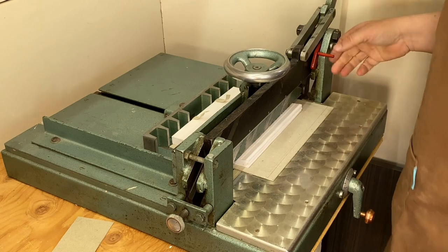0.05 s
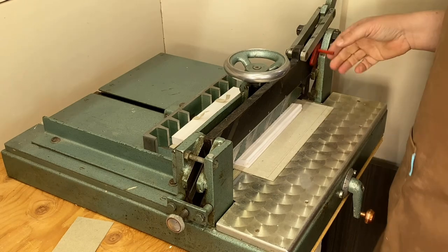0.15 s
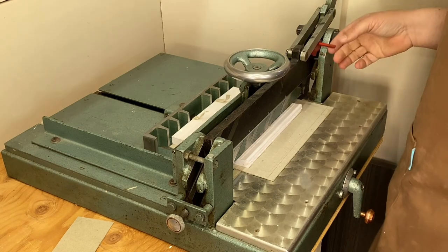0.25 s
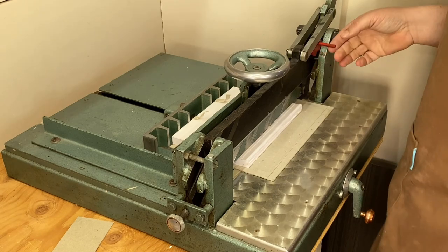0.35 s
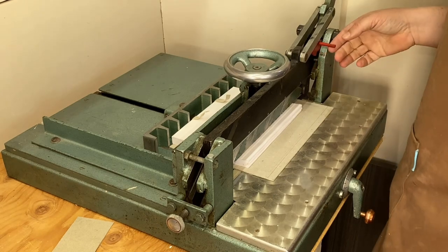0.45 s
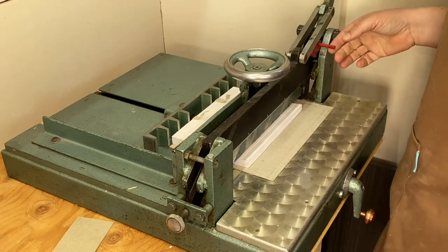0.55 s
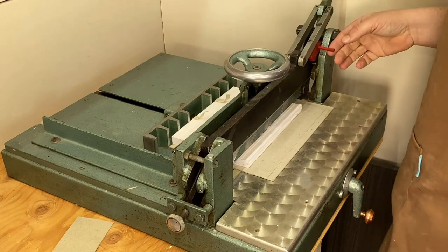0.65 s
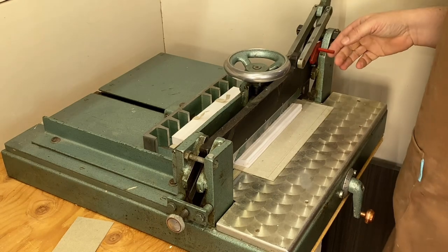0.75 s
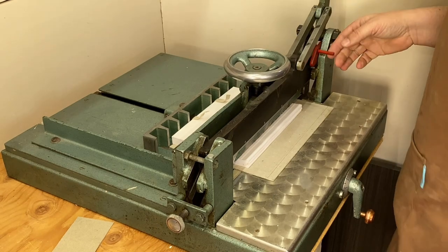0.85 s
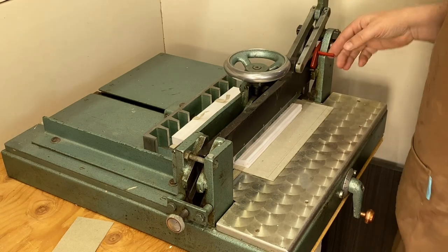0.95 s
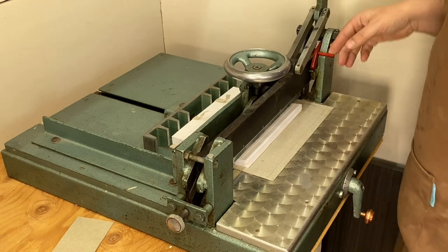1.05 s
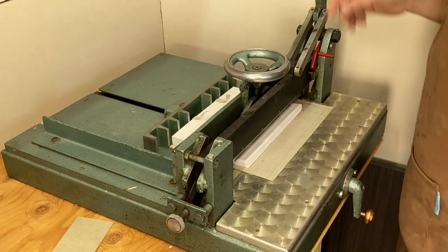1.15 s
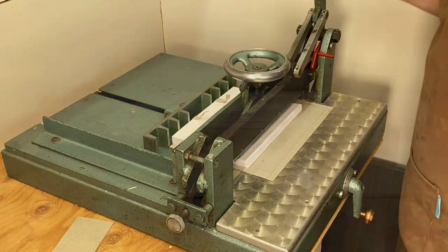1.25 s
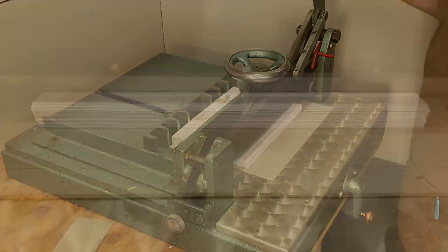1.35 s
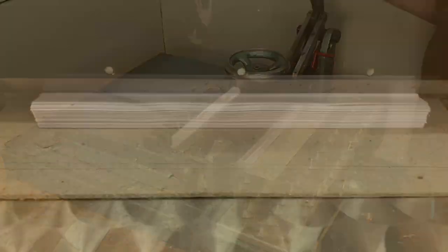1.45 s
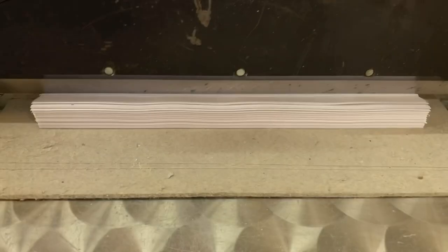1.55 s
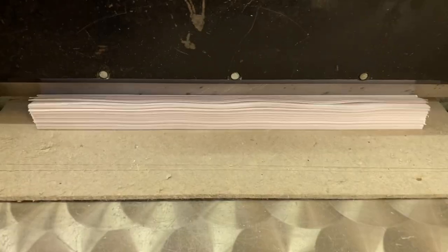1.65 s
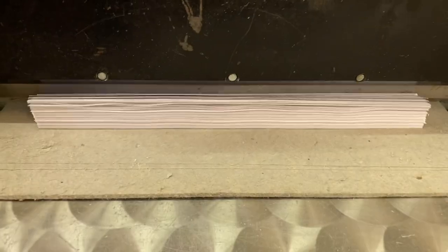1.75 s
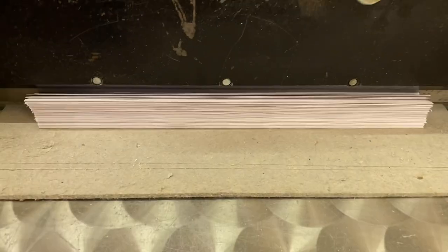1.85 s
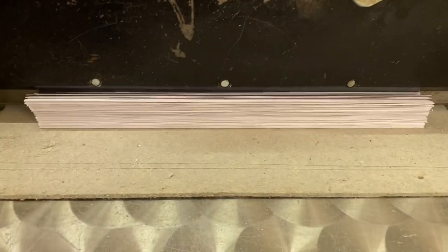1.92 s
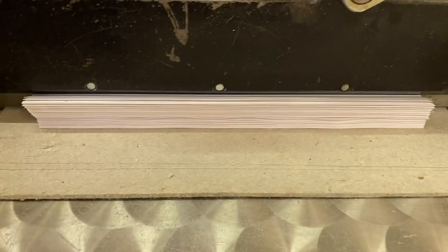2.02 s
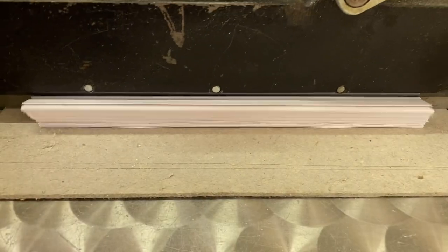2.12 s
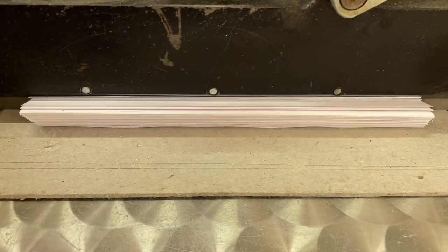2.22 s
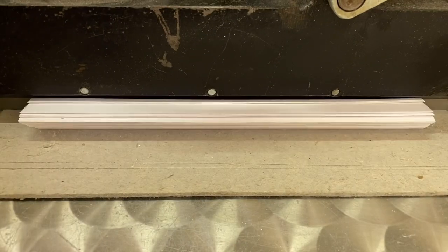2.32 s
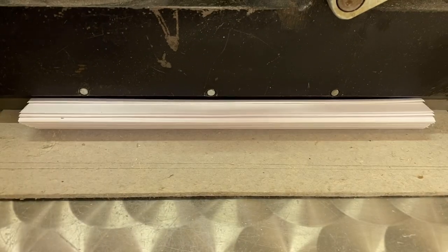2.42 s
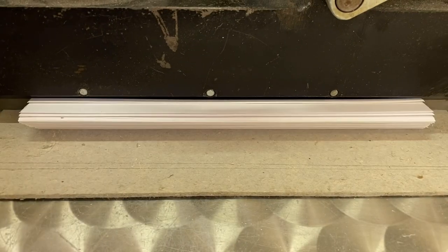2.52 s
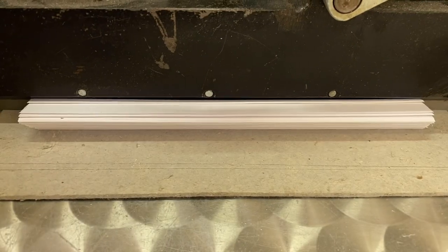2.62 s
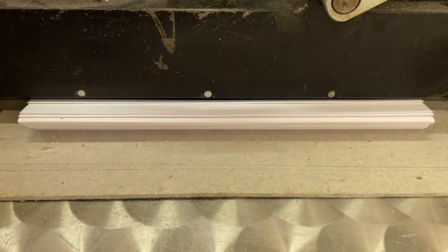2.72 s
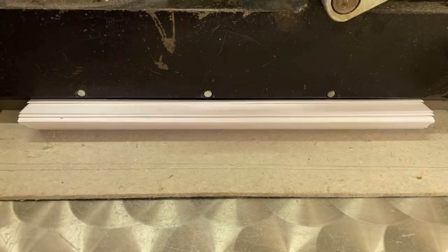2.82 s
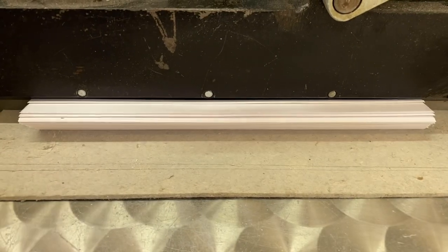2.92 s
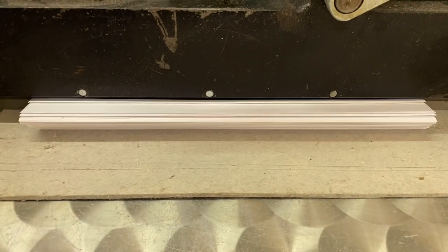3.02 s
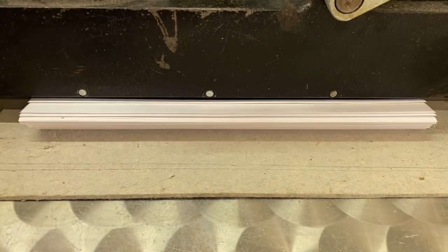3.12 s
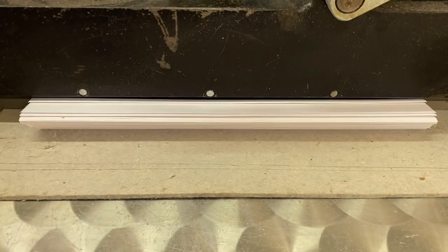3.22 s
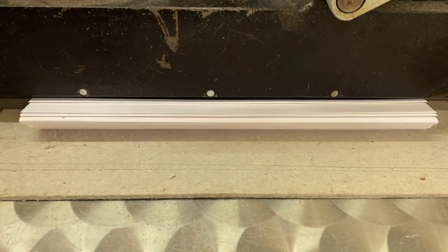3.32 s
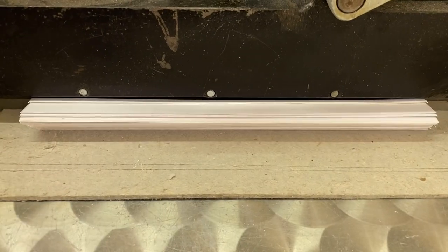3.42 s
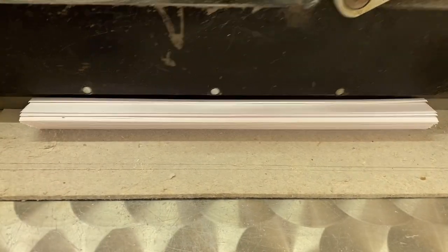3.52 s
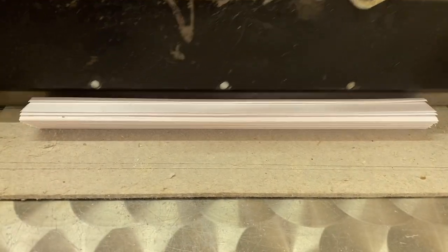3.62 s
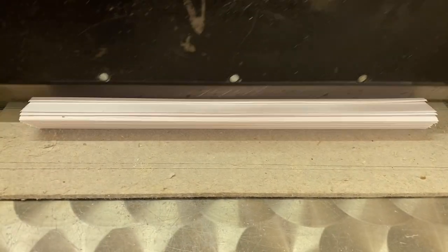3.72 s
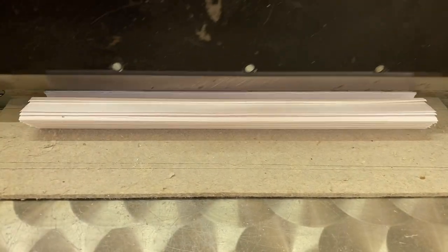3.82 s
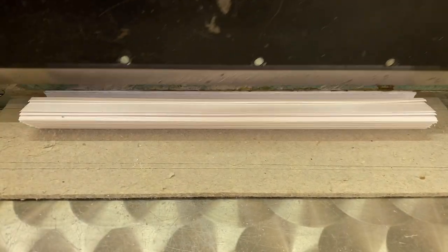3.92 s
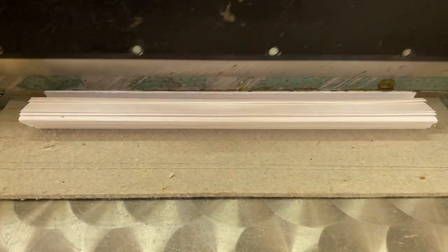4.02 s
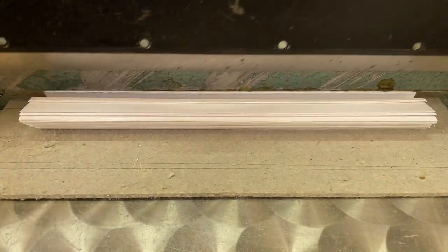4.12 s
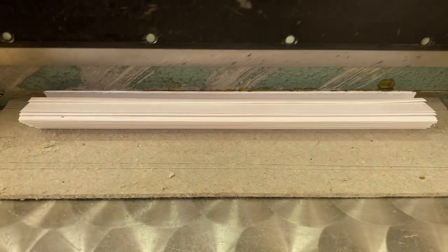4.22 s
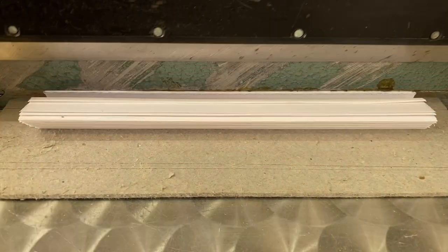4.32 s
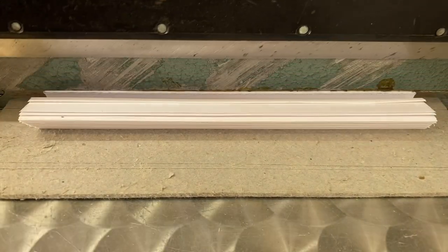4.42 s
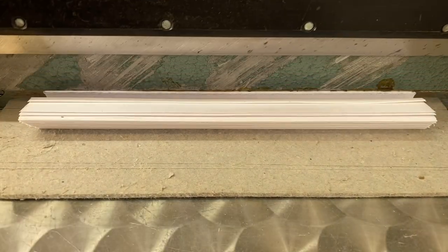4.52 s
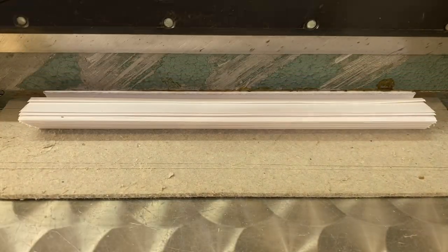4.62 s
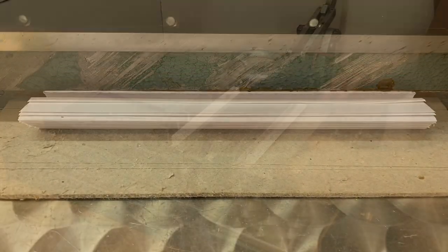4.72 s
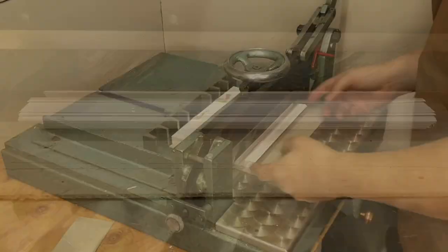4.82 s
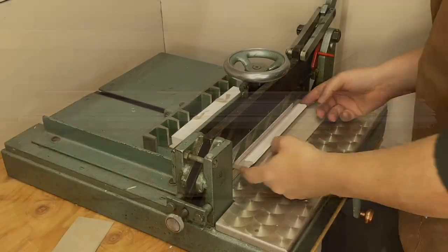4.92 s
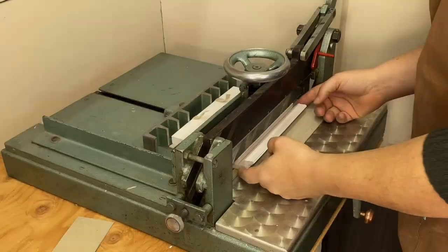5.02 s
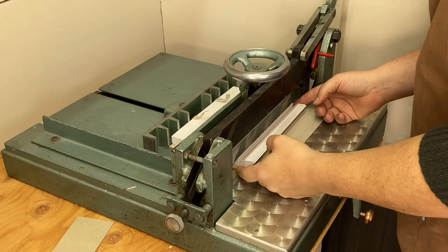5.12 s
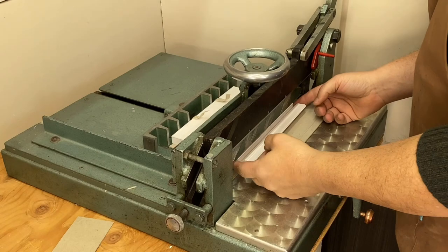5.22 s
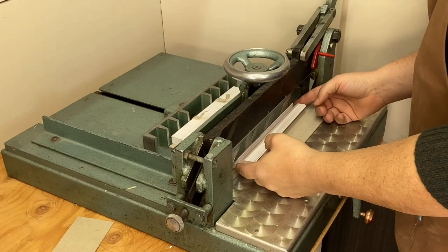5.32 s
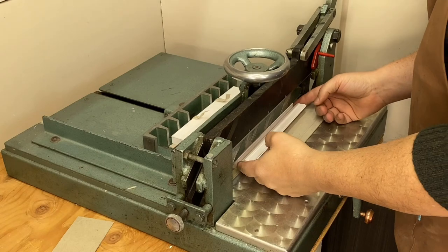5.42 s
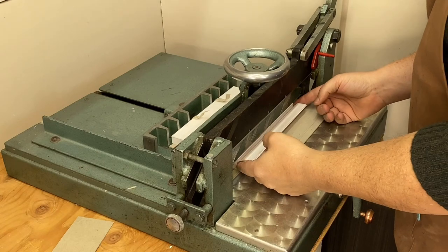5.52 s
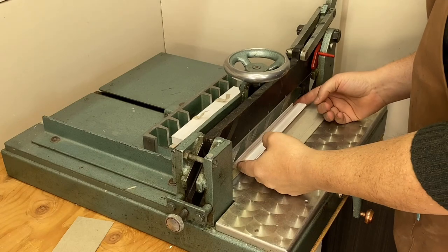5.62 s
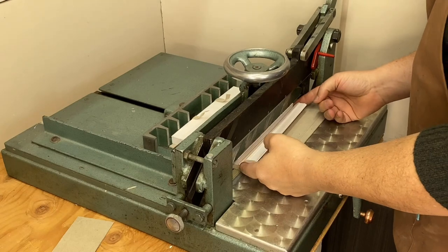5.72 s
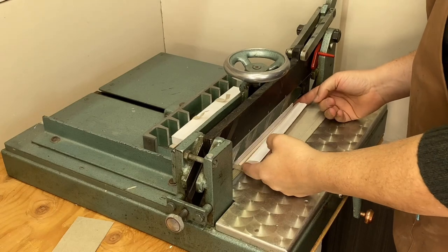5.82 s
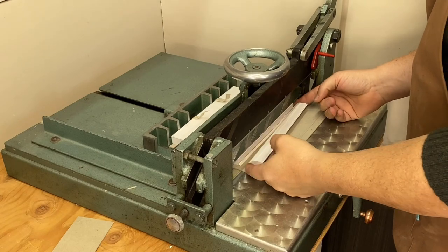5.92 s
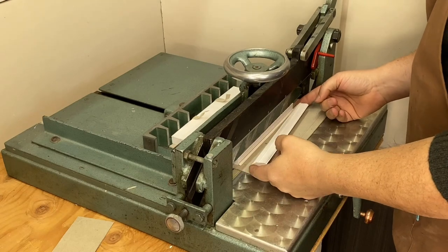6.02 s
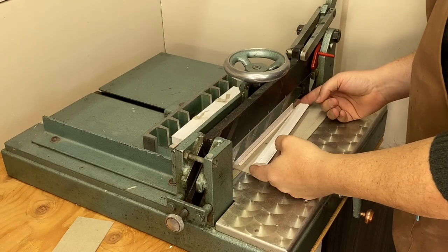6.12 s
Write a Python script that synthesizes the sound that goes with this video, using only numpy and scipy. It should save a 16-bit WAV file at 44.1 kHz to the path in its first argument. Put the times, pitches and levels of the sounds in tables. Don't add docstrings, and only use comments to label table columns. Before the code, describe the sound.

Metal lever knocks, then a cast-iron paper cutter grinds and groans through a stack, bangs on its bed, and the lever clacks up and latches.

```python
import sys
import numpy as np
from scipy import signal
from scipy.io import wavfile
from scipy.ndimage import uniform_filter1d

SR = 44100
rng = np.random.default_rng(int(sys.argv[2]) if len(sys.argv) > 2 else 0)


def inscribe(sig):
    pcm = np.round(np.clip(np.atleast_2d(sig).T, -1, 1) * 32767)
    wavfile.write(sys.argv[1], SR, pcm.astype(np.int16))


def attenuation_scalar(level_db):
    decades = np.asarray(level_db, float) / 20
    return 10 ** decades


N = 271656

# freq_hz, level_db
ROOM_TONE = [(35, -32), (60, 3.5), (161, -12.5), (384, -16), (629, -25), (759, -26), (874, -25),
             (5600, -39), (14000, -38.5), (15400, -44), (16500, -65)]
# freq_hz, width_hz, level_db
ROOM_WHINES = [(759, 54, 2.5), (11050, 80, -9)]
SWAY_HZ = (17.8, 28.4)
# time_s, level_db
LOAD = [(0.0, -45.5), (0.14, -34.5), (.6, -39), (1.05, -43), (1.27, -32), (1.45, -50), (1.52, -25),
        (2.3, -20), (2.4, -24), (2.55, -25), (2.7, -22), (3.95, -21.5), (4.2, -29), (4.5, -35), (5.0, -42),
        (5.7, -48.5), (6.16, -43.5)]
# time_s, slow_mode_db, fast_mode_db
HEAVES = [(1.3, -26, -33.5), (1.53, -20.5, -23.5), (1.78, -13.5, -22), (1.99, -13, -11.5),
          (2.13, -43, -17.5), (2.3, -21, -36), (2.75, -10.5, -18), (2.83, -31, -27), (3.02, -39, -45),
          (3.24, -21, -19), (3.5, -13, -49), (3.678, -9, -14.5), (3.829, -18, -23.5), (4.05, -47, -21.5)]
# start_s, level_db
JOLTS = [
    (1.35, -20.5),
    (1.92, -28),
    (2.592, -5.5),
    (3.55, -24.5),
    (3.92, -36),
    (4.88, -38),
]
# time_s, gain_db
LULLS = [(1.13, 0), (2.225, 0), (2.39, -16), (2.54, -4), (2.72, -3), (3.07, -7.5), (3.45, -3), (4.2, -6),
         (4.33, -3), (4.47, -5)]
# time_s, level_db
MOTION = [(0.0, -67), (1.29, -72), (1.41, -66), (1.53, -58.5), (1.71, -43.5), (2.04, -46.5), (2.13, -50),
          (2.32, -60.5), (2.54, -60), (2.69, -48), (2.85, -61.5), (3.21, -64), (3.38, -54.5), (3.62, -51.5),
          (3.75, -57), (4.15, -59), (4.3, -67.5), (6.16, -75)]
# start_s, length_s, frame_db, bench_top_db
PRESSES = [
    (0.0, 0.26, 1, 6.5),
    (0.483, 0.19, 11.5, 9),
    (1.41, 0.079, -0.5, 2),
    (1.413, 0.66, 16, 2.5),
    (2.063, 0.56, 0.5, -1.5),
    (2.445, 0.2, 9.5, -6),
    (3.38, 0.044, -22.5, 0),
    (3.546, 0.15, -18, 3.5),
    (4.126, 0.56, 0.5, 5),
    (4.958, 1.5, 1, -9.5),
]
# freq_hz, width_hz, level_db
FRAME = [(108, 11.2, 5.5), (138.3, 6.3, 3), (182.4, 25, -1.5), (255, 7.8, -5.5), (300, 24, -3),
         (360.6, 18, -3.5), (420, 18, -6), (480, 9.6, -10.5), (534, 18.6, -13), (837, 90, -13),
         (998, 35, -18), (1545, 100, -24)]
# freq_hz, level_db_per_hz
SHEAR = [(290, -24.5), (500, -20.5), (820, -10), (1500, -10.5), (2700, -14), (5000, -16), (8800, -22),
         (12000, -34.5), (15500, -21.5)]
# start_s, peak_db, thud_re_peak_db, brightness_re_peak_db, t60_s
KNOCKS = [(0.031, -34, -10.5, -12, 0.3), (0.175, -33, -14, -30, 0.19), (0.204, -23.5, -14, -27, 0.2),
          (0.262, -51, 7, -25, 0.44), (0.304, -37, -15, -35, 0.13), (0.313, -34.5, 18.5, -35, 0.22),
          (0.436, -56, -9, -29, 0.1), (0.648, -21.5, -4, -12.5, 0.21), (0.915, -55, 4.5, -3, 0.26),
          (1.151, -45, 15.5, -30, 0.22), (1.35, -19, -0.5, -17, 0.25), (1.472, -34, -2, -12, 0.22),
          (1.497, -35.5, 0, -3.5, 0.78), (1.644, -35, 20, -33, 0.18), (2.115, -36, 2, -7, 0.11),
          (2.324, -39.5, -1.5, -5, 0.17), (2.428, -43.5, -11, -4.5, 0.057), (2.99, -53, 15, -18, 0.24),
          (3.147, -38, 4, -18, 0.31), (3.368, -39.5, -3, -23, 0.3), (4.088, -39, -5, -5.5, 0.22)]
# start_s, peak_db, thud_re_peak_db, brightness_re_peak_db, t60_s
TOUCHES = [(0.64, -35, -25, -32, 0.072), (.9925, -20, -31, -2, 0.053), (1.001, -27, -2, 2.5, 0.043),
           (1.009, -24, -10.5, -16, 0.29), (1.019, -35.5, -34, 2, 0.22), (1.336, -45, 16.5, -16, 0.51),
           (2.815, -41, 2, -3.5, 0.033), (3.068, -42, 11, -8, 0.13), (3.081, -29, 1, -17, 0.2),
           (3.482, -28.5, 5.5, -21, 0.29), (3.499, -16, -12, -2.5, 0.18), (3.722, -37.5, 7.5, -9, 0.073),
           (3.735, -47, 17.5, -16, 0.23), (3.984, -27.5, -9.5, -22, 0.19), (4.674, -56, 17, -49, 0.23),
           (4.880, -63, -4, -29, .05), (5.388, -66, -5.5, -1, 0.055), (5.897, -51, -17, -9, 0.047)]
# freq_hz, level_db
KNOCK_COLOUR = [(70, -2.5), (130, 5.5), (300, 6.5), (700, -6), (1500, -7.5), (3500, -12), (7000, -5.5),
                (11000, -12), (16000, -20)]
# freq_hz, share_of_t60
DECAY_SHARE = [(80, 1.49), (300, 0.58), (1500, 0.66), (6000, 0.85), (15000, 0.83)]
# start_s, freq_hz,
# width_hz, level_db, t60_s
SHEENS = [(.033, 5500, 4000, -50, 0.17), (.263, 5500, 4000, -62, .05), (.316, 4330, 1500, -50.5, 0.17),
          (.652, 5970, 2500, -54, 0.17), (1.004, 2820, 1300, -30.5, 0.17), (1.003, 8400, 3000, -41, 0.25),
          (1.225, 5800, 4000, -57, 0.017), (1.352, 5400, 2560, -37, 0.18), (1.648, 1040, 500, -32, 0.094),
          (1.6993, 2500, 3000, -47, .02), (1.7895, 3000, 4000, -37, .018), (1.818, 4200, 3000, -38, 0.024),
          (1.851, 1900, 900, -40, 0.036), (1.932, 2200, 3010, -40, 0.016), (2.408, 6100, 8000, -59, .03),
          (2.474, 5000, 8000, -63, .03), (2.591, 3920, 250, -31, 0.25), (2.591, 9650, 500, -34, 0.15),
          (2.591, 13200, 250, -54, 0.14), (2.592, 6400, 500, -37.5, 0.13), (3.483, 4570, 4000, -49, 0.039),
          (3.507, 3640, 500, -28.5, 0.097), (3.508, 475, 350, -23.5, 0.13),
          (4.703, 3400, 1600, -28.5, 0.066), (5.138, 4400, 5000, -53, .03), (5.155, 6000, 8000, -63, .03),
          (5.217, 4500, 5000, -59, .03), (5.233, 5000, 8000, -63, .03), (5.51, 6000, 8000, -63, .02),
          (5.548, 6000, 6000, -59, .02), (5.72, 5470, 5000, -56.5, 0.026), (5.953, 4970, 6000, -69, 0.024),
          (.035, 4270, 510, -46, 0.043), (0.176, 3530, 2000, -47, 0.09), (0.203, 3770, 1800, -47, 0.085),
          (0.312, 3800, 2480, -47, .1), (1.729, 1980, 2500, -39, .02), (3.985, 3700, 3600, -41.5, 0.16),
          (5.389, 6000, 4960, -55, 0.016), (2.815, 5100, 1190, -50, 0.037), (1.005, 4470, 1200, -40, 0.18)]
# start_s, pitch_hz, level_db, t60_s
PARTS = [
    (.035, 161, -55, 0.19),
    (.039, 1520, -42, .1),
    (.208, 660, -40.5, 0.12),
    (.216, 1755, -38, 0.12),
    (.324, 272, -24, 0.22),
    (1.226, 5600, -59, 0.0083),
    (1.358, 4140, -30, 0.016),
    (1.501, 4100, -43, .07),
    (2.677, 2560, -48, .05),
    (2.781, 499, -42, 0.3),
]
# start_s, pitch_hz, level_db, t60_s
CLUNKS = [
    (.328, 520, -48, 0.09),
    (.653, 623, -24, 0.12),
    (.657, 421, -19, 0.1),
    (.919, 466, -42.5, 0.083),
    (1.011, 481, -26.5, 0.14),
    (1.156, 420, -49, 0.14),
    (3.089, 279, -22, 0.036),
    (3.739, 379, -35, 0.11),
    (4.909, 433, -26.5, 0.095),
]
# start_s, pitch_hz, level_db, t60_s
THUMPS = [
    (.652, 117, -27, 0.28),
    (1.006, 128, -35, 0.33),
    (1.354, 131.2, -22, 0.68),
    (3.084, 114, -16, 0.23),
    (4.9, 114, -22.5, 0.1),
]
# centre_s, half_length_s, freq_hz, width_hz, level_db
RUBS = [(1.51, 0.014, 9000, 10000, -52.5), (1.77, 0.08, 8200, 3000, -51), (1.95, 0.046, 8000, 2600, -79),
        (2.075, 0.064, 5000, 2100, -57), (2.68, .012, 2800, 520, -51), (2.745, 0.02, 5150, 800, -52),
        (2.74, 0.062, 760, 600, -47.5), (2.87, 0.039, 4900, 700, -72), (3.63, 0.039, 1300, 550, -52),
        (3.64, 0.071, 4700, 5800, -60), (4, 0.035, 6000, 4005, -67), (5.46, 0.018, 5600, 3930, -72),
        (5.61, 0.035, 4800, 1200, -71.5), (5.87, 0.043, 12800, 1500, -74), (0.39, 0.0086, 2300, 2200, -67),
        (.275, 0.015, 500, 540, -55), (4.683, 0.0048, 850, 1000, -51.5), (4.5, 0.066, 104, 75, -51),
        (4.15, 0.084, 260, 49, -54), (6.1, 0.014, 4000, 250, -73), (5.24, .025, 4060, 220, -74),
        (5.149, .016, 5200, 2200, -63), (5.236, 0.022, 4620, 250, -71), (5.156, .013, 764, 110, -56),
        (5.146, .012, 990, 180, -57), (5.151, .013, 1420, 110, -60), (5.151, .016, 4100, 250, -69),
        (5.239, .01, 969, 150, -60), (5.236, .011, 1200, 250, -61), (5.226, .015, 2770, 200, -71),
        (5.33, .05, 5200, 2500, -72), (2.56, .02, 2500, 900, -65.5), (5.815, 0.088, 9000, 3000, -74)]
# start_s, pitch_hz, level_db, t60_s
JUDDERS = [(1.652, 372, -23.5, 0.19), (1.668, 154, -19.5, 0.13), (1.785, 480, -30, .2),
           (1.862, 500, -27, .15), (1.905, 174, -18, 0.11), (1.932, 371, -26.5, 0.25),
           (1.965, 189, -22.5, 0.36), (1.985, 398, -24, .15), (2.012, 174, -18, 0.15),
           (2.085, 395, -29, 0.24), (4.886, 330, -34, 0.067), (4.918, 224, -34.5, 0.077),
           (.32, 712, -45, 0.081), (2.6, 3910, -42, .35)]
# start_s, pitch_hz, level_db, t60_s
SNAGS = [
    (1.48, 242.6, -31, 0.92),
    (1.555, 300, -25.5, 0.22),
    (1.592, 137, -25, .48),
    (1.735, 274.5, -20.5, 0.69),
    (1.80, 255, -16, 0.15),
    (1.859, 246, -21.5, 0.22),
    (2.133, 160, -19, 0.14),
]
# start_s, level_db
SNAPS = [
    (1.641, -32),
    (1.7, -31),
    (1.7891, -23.5),
    (1.8197, -25),
    (1.932, -26.5),
    (1.982, -27.5),
]
# start_s, peak_db, thud_re_peak_db, brightness_re_peak_db, t60_s
BED_HIT = [
    (2.5885, -14, -1.5, -13, 0.22),
]
# freq_hz, level_db
BED_COLOUR = [(70, 1.5), (300, -2), (1500, -5), (2600, -8), (4000, -13.5), (5500, 3.5), (7500, -8.5),
              (8600, -13), (10500, -10), (12500, -11), (16000, -25)]
# freq_hz, spread_hz, level_db, t60_s
BLADE = [(117.1, 14, -16.5, 0.51), (212, 21, -22.5, 0.27), (349, 8.8, -25, 0.19), (463, 27.4, -29.5, 0.38),
         (833, 21, -23.5, 0.23), (1610, 69, -43.5, .08), (3500, 130, -29, 0.16), (3710, 120, -26.5, 0.19),
         (4047, 110, -21, 0.14), (6440, 290, -35.5, 0.12), (8030, 100, -69.5, 0.29), (8750, 120, -45.5, .2),
         (9650, 200, -37, 0.25), (13200, 100, -48.5, .2)]
# time_s, level_db
SQUEAL = [(2.648, -70), (2.665, -44), (2.74, -45.5), (2.80, -49.5), (2.85, -53), (2.862, -76), (2.9, -72)]
# freq_hz, width_hz, level_db
SQUEAL_NOTE = [(1226, 22, 0)]
# start_s, peak_db, thud_re_peak_db, brightness_re_peak_db, t60_s
STOP_HIT = [
    (3.504, -13.5, -5.5, -5.5, 0.27),
]
# freq_hz, spread_hz, level_db, t60_s
LEVER = [(125.5, 2, -19, 0.24), (253, 7.4, -28, 0.34), (394, 35.5, -13.5, 0.12), (803, 41.5, -22.5, 0.16),
         (1214, 120, -25, 0.14), (1520, 75, -19, 0.096), (2740, 94, -25, 0.1), (3740, 85, -24.5, 0.15)]
# start_s, peak_db, thud_re_peak_db, brightness_re_peak_db, t60_s
LATCH = [
    (4.698, -16.5, -12, -5, 0.21),
]
# freq_hz, level_db
LATCH_COLOUR = [(70, -0.5), (300, 5), (1150, -11), (3000, -9), (7000, -7.5), (12000, -5.5), (16000, -20)]
# start_s, peak_db, thud_re_peak_db, brightness_re_peak_db, t60_s
CATCH = [
    (4.884, -19, -14.5, -0.11, 0.27),
]
# freq_hz, width_hz
CATCH_NOTCHES = [(3720, 1200), (10400, 4800)]
# start_s, ramp_s, hold_s, drone_db, rustle_db
DRAGS = [
    (5.11, 0.026, 0.033, -54, -51.5),
    (5.191, 0.034, 0.022, -58, -56),
    (5.353, 0.42, 0.19, -91, -55.5),
    (5.584, 0.043, 0.34, -63.5, -94),
    (6.094, 0.049, .1, -64, -73),
]
# freq_hz, width_hz, level_db
SLIDE = [(494, 190, 1), (767, 91, -0.5), (1023, 73, -1.5), (1430, 42, -4), (2200, 560, -11),
         (4300, 140, -10)]
# freq_hz, level_db_per_hz
RUSTLE = [(880, -22), (1500, -2), (1690, -6.5), (2800, -2), (3310, -10), (5490, -1.5), (11700, -18),
          (13100, -15.5), (16000, -6)]


def rms_one(x):
    return x / np.sqrt(np.mean(x ** 2) + 1e-20)


def in_time(rows, off=None):
    s, *columns = np.transpose(rows)
    return [np.interp(np.arange(N) / SR, s, c, off, off) for c in columns]


def at_hz(points, hz):
    freq_hz, value = np.transpose(points)
    return np.interp(np.log(hz), np.log(freq_hz), value)


def ramps(starts, lengths, rise, fall):
    t = np.arange(N) / SR - np.array(starts)[:, None]
    rise = np.reshape(rise, (-1, 1))
    falling = 1 + (np.array(lengths)[:, None] + rise - t) / fall
    return np.clip(np.minimum(t / rise, falling), 0, 1)


def drift(rate_hz):
    r = np.exp(-2 * np.pi * rate_hz * 40 / SR)
    slow = signal.lfilter([1], [1, -2 * r, r * r], rng.standard_normal(N // 40 + 2002))[2000:]
    return np.interp(np.arange(N) / 40, np.arange(len(slow)), rms_one(slow))


def bandpass(x, order, low_hz, high_hz):
    return signal.sosfilt(signal.butter(order, [low_hz, high_hz], "band", fs=SR, output="sos"), x)


def in_band(x, hz, width_hz):
    low = np.sqrt(hz ** 2 + width_hz ** 2 / 4) - width_hz / 2
    return rms_one(bandpass(x, 2, low, low + width_hz))


def noise_bands():
    edges = np.geomspace(60, 16200, 22)
    white = rng.standard_normal((2, N))
    for k, (low, high) in enumerate(zip(edges, edges[1:])):
        yield np.sqrt(low * high), bandpass(white[k % 2], 2, low, high)


def coloured(spectrum, patchy_db):
    return rms_one(sum(attenuation_scalar(at_hz(spectrum, hz) + patchy_db * drift(2.4)) * band
                       for hz, band in noise_bands()))


def resonator(x, hz, r, zeros):
    return signal.lfilter(zeros, [1, -2 * r * np.cos(2 * np.pi * hz / SR), r * r], x)


def resonate(x, peaks, patchy_db):
    out = 0
    for k, (hz, width_hz, db) in enumerate(peaks):
        r = np.exp(-np.pi * width_hz / SR)
        rung = resonator(x * attenuation_scalar(patchy_db * drift(7.3)), hz, r, [1, 0, -1])
        out = out + (-1) ** k * attenuation_scalar(db) * rms_one(rung)
    return rms_one(out)


def grit(per_s, spread_db):
    sizes = attenuation_scalar(spread_db * np.minimum(rng.exponential(1, N), 5)) * rng.choice([-1, 1], N)
    return sizes * (rng.random(N) < per_s / SR) + 1e-18


def iron(x, ring_db, t60):
    t = np.arange(SR // 10) / SR
    response = rng.standard_normal(len(t)) * attenuation_scalar(-60 * t / t60)
    response = response / np.sqrt(np.sum(response ** 2))
    return x + attenuation_scalar(ring_db) * signal.fftconvolve(x, response)[:len(x)]


def knocks(table, colour, crack_db, tail_db, rattle_s):
    out, t = np.zeros(N + SR), np.arange(SR // 2) / SR
    tint_db = rng.normal(0, 1, (len(table), 24))
    uneven = attenuation_scalar(0.82 * drift(320))
    for k, (hz, band) in enumerate(noise_bands()):
        band = np.pad(rms_one(band) * uneven, (0, SR))
        swell = 1 - np.exp(-t / (0.00035 + 4.9 / hz))
        for (s, db, thud_db, bright_db, t60), own_db in zip(table, tint_db):
            tilt = [(350, thud_db), (1300, 0), (2800, 0), (7000, bright_db), (14000, 1.7 * bright_db)]
            level_db = db - 13 + at_hz(tilt, hz) + at_hz(colour, hz) + own_db[k]
            body = attenuation_scalar(-60 * np.maximum(t - rattle_s, 0) / (t60 * at_hz(DECAY_SHARE, hz)))
            shape = body + attenuation_scalar(crack_db - 60 * t / 0.021) + attenuation_scalar(tail_db - 60 * t / 0.26)
            i = round(s * SR)
            out[i:i + len(t)] += attenuation_scalar(level_db) * swell * shape * band[i:i + len(t)]
    return iron(out[:N], ring_db=-10, t60=0.05) * attenuation_scalar(-1.2)


def ringing(rows):
    out, t = np.zeros(N + SR), np.arange(SR // 2) / SR
    for (s, hz, spread_hz, db, t60), chance in zip(rows, rng.random((len(rows), 10))):
        pitches = hz + spread_hz * (np.linspace(-1, 1, 5) + 0.5 * chance[:5] - 0.25)
        turns = chance[5:, None] * min(hz / 2000, 1)
        beat = np.sin(2 * np.pi * (pitches[:, None] * t + turns)).sum(axis=0) / np.sqrt(5)
        out[round(s * SR):][:len(t)] += attenuation_scalar(db - 60 * t / t60) * (1 - np.exp(-t * hz / 1.12)) * beat
    return out[:N]


def struck(rows, spread):
    return ringing([(s, hz, spread * hz, db, t60) for s, hz, db, t60 in rows])


def room():
    tone = attenuation_scalar(-60) * coloured(ROOM_TONE, patchy_db=2.0)
    return tone + attenuation_scalar(-73.5) * resonate(rng.standard_normal(N), ROOM_WHINES, patchy_db=-0.5)


def rocking_mode(hz):
    strength = np.sqrt(2) * attenuation_scalar(3.47 * drift(6.9))
    return strength * np.sin(2 * np.pi * np.cumsum(hz * (1 + 0.0602 * drift(3.66))) / SR)


def bench():
    load_db, = in_time(LOAD)
    t = np.arange(N) / SR
    heave_s, slow_db, fast_db = np.transpose(HEAVES)
    heave = np.exp(-0.5 * ((t - heave_s[:, None]) / 0.046) ** 2)
    slow, fast = [rocking_mode(hz) for hz in SWAY_HZ]
    rocking = (attenuation_scalar(load_db) + attenuation_scalar(slow_db) @ heave) * slow + (attenuation_scalar(load_db) + attenuation_scalar(fast_db) @ heave) * fast
    lull_db = sum(db * np.exp(-0.5 * ((t - s) / 0.019) ** 2) for s, db in LULLS)
    rise_s, t60_s = 0.038, 0.39
    jolt = sum(attenuation_scalar(db - 60 * np.maximum(t - s, 0) / t60_s) * np.clip((t - s) / rise_s, 0, 1)
               for s, db in JOLTS)
    shudder = rms_one(bandpass(rng.standard_normal(N), 3, 34, 75))
    shudder_level = attenuation_scalar(-33 + 0.61 * load_db) + attenuation_scalar(-10.0) * jolt
    return attenuation_scalar(lull_db - 3.5) * rocking + shudder_level * shudder


def crackle():
    grains, dealt, out = grit(900, spread_db=2.5), rng.integers(0, 12, N), 0
    for k, hz in enumerate(np.geomspace(500, 9000, 12)):
        r = attenuation_scalar(-60 * hz / (6.0 * SR))
        out = out + resonator(grains * (dealt == k) + 1e-18, hz, r, [1])
    return rms_one(out)


def friction():
    hiss_db, = in_time(MOTION)
    start, length, frame_db, top_db = np.transpose(PRESSES)
    press = ramps(start, length, rise=0.09, fall=0.09)
    slips = grit(1500, spread_db=1.5)
    hum = resonate(slips, FRAME[:2], patchy_db=4.0)
    groan = resonate(slips, FRAME[2:], patchy_db=2.5)
    body = attenuation_scalar(10.5 + top_db @ press) * hum + attenuation_scalar(3 + frame_db @ press) * groan
    hiss = coloured(SHEAR, patchy_db=2.4) * attenuation_scalar(0.68 * drift(45))
    sheets = attenuation_scalar(2 * hiss_db + 43.5) * crackle()
    return attenuation_scalar(hiss_db) * (body + attenuation_scalar(0.5) * hiss) + sheets


def small_knocks():
    return (knocks(KNOCKS, KNOCK_COLOUR, crack_db=11.5, tail_db=-40.0, rattle_s=0.01)
            + knocks(TOUCHES, KNOCK_COLOUR, crack_db=10.0, tail_db=-67.0, rattle_s=0.012))


def sheens():
    out, t = np.zeros(N + SR), np.arange(SR // 4) / SR
    for s, hz, width_hz, db, t60 in SHEENS:
        shape = attenuation_scalar(db - 60 * t / t60) * (1 - np.exp(-t * hz / 2))
        out[round(s * SR):][:len(t)] += shape * in_band(rng.standard_normal(len(t)), hz, width_hz)
    return out[:N]


def loose_rings():
    return struck(PARTS, spread=0.05) + struck(CLUNKS, spread=0.232) + struck(THUMPS, spread=0.093)


def rubs():
    slips, out = grit(9000, spread_db=0.5), np.zeros(N)
    for s, half_s, hz, width_hz, db in RUBS:
        first, last = max(round((s - 4 * half_s) * SR), 0), min(round((s + 4 * half_s) * SR), N)
        i = np.arange(first, last)
        swell = np.exp(-0.5 * ((i / SR - s) / half_s) ** 2)
        out[i] += attenuation_scalar(db) * swell * in_band(slips[i], hz, width_hz)
    return out


def blade_lurches():
    snaps = ringing([(s, 1493, 350, db, 0.022) for s, db in SNAPS])
    return struck(JUDDERS, spread=0.044) + struck(SNAGS, spread=0.026) + snaps


def bed_hit():
    blow = knocks(BED_HIT, BED_COLOUR, crack_db=21.0, tail_db=-7.0, rattle_s=0.0023)
    return blow + ringing([(BED_HIT[0][0], *mode) for mode in BLADE])


def squeal():
    level_db, = in_time(SQUEAL, off=-120)
    slips = grit(6000, spread_db=-4.5)
    band = resonate(slips, SQUEAL_NOTE, patchy_db=-5.0)
    band = rms_one(band / (np.sqrt(uniform_filter1d(band ** 2, size=500)) + 0.27))
    scrape_peaks = [(330, 30, 12), (479, 25, 16), (1130, 33, 2.3), (4980, 700, 6.6)]    # hz, width_hz, db
    return attenuation_scalar(level_db) * (band + attenuation_scalar(-6.0) * resonate(slips, scrape_peaks, patchy_db=1.5))


def stop_hit():
    blow = knocks(STOP_HIT, KNOCK_COLOUR, crack_db=19.0, tail_db=-26.0, rattle_s=0.015)
    return blow + ringing([(STOP_HIT[0][0], *mode) for mode in LEVER])


def latch():
    catch = knocks(CATCH, KNOCK_COLOUR, crack_db=16.0, tail_db=-42, rattle_s=0.0043)
    for hz, width_hz in CATCH_NOTCHES:
        catch = signal.lfilter(*signal.iirnotch(hz, hz / width_hz, SR), catch)
    return catch + knocks(LATCH, LATCH_COLOUR, crack_db=12.0, tail_db=-43, rattle_s=0.022)


def paper():
    start, ramp, hold, drone_db, rustle_db = np.transpose(DRAGS)
    drag = ramps(start, hold, ramp, fall=0.055) ** 2
    drone = resonate(grit(1900, spread_db=-1.0), SLIDE, patchy_db=0.5)
    rustle = coloured(RUSTLE, patchy_db=0.8) * attenuation_scalar(2.5 * drift(60))
    rustle = rustle + attenuation_scalar(-2) * coloured(SHEAR, patchy_db=1.5)
    return attenuation_scalar(drone_db) @ drag * drone + attenuation_scalar(rustle_db - 9.0) @ drag * rustle


def scene():
    background = room() + bench()
    handling = small_knocks() + sheens() + loose_rings()
    cut = friction() + rubs() + blade_lurches() + bed_hit() + squeal()
    after = stop_hit() + latch() + paper()
    return (background + handling + cut + after)[None]


def top_cut(x):
    return signal.sosfilt(signal.butter(12, 16780, fs=SR, output="sos"), x)


def record(dry):
    rounded = 1.336 * np.tanh(dry / 1.141)
    mix = signal.sosfilt(signal.cheby2(16, 60, 16500, fs=SR, output="sos"), rounded)
    return top_cut(mix)


dry = scene()
out = record(dry)
inscribe(out)
```